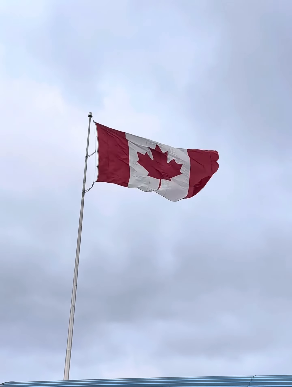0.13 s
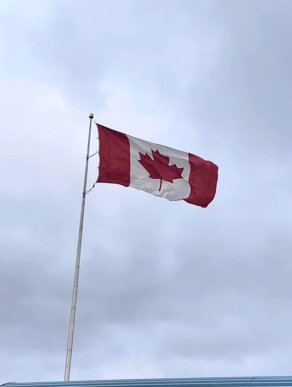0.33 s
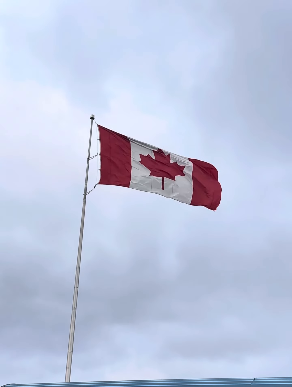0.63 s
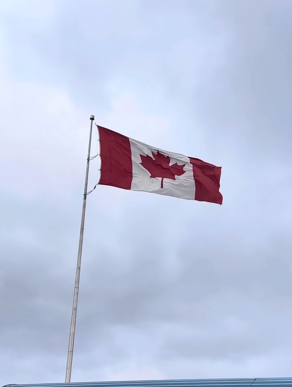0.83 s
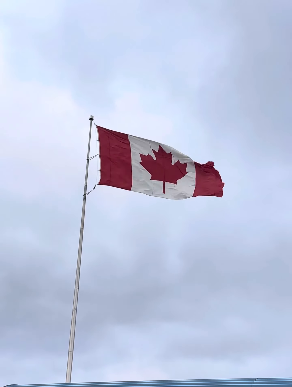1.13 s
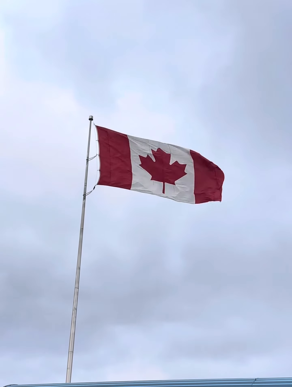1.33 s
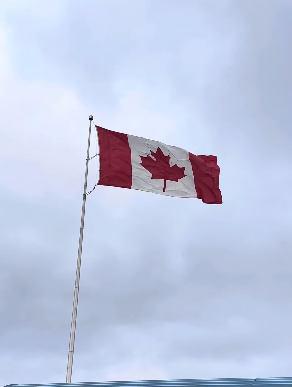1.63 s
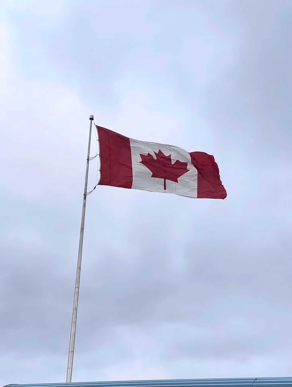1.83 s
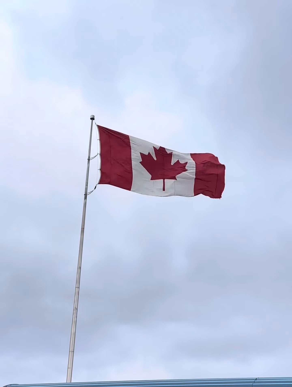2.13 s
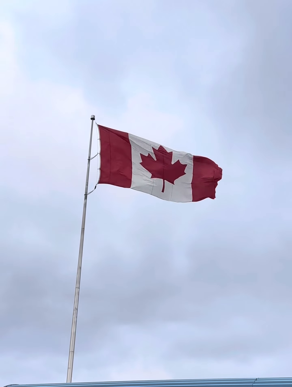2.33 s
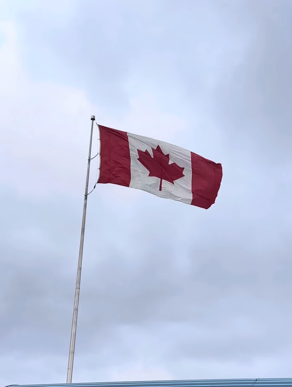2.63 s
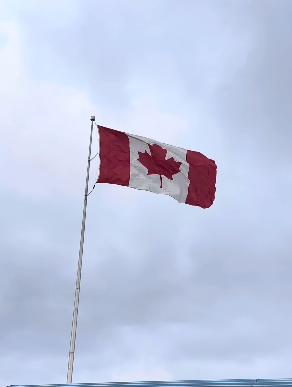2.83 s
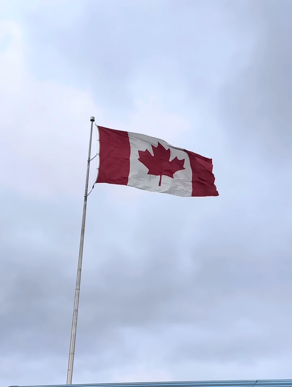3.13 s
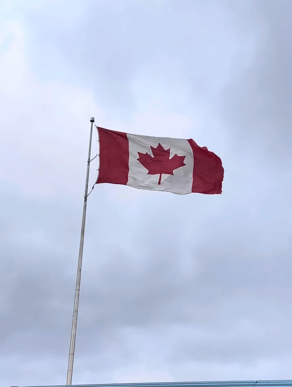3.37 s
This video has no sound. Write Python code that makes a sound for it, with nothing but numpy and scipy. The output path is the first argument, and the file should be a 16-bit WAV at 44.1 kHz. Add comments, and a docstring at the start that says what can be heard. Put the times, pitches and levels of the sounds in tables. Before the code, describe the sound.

Strong wind buffets and rumbles on a microphone while a flag flaps and cracks outdoors

```python
"""Strong wind drums, buffets and roars, slowly easing; a flag rustles, flutters, swishes, flaps and cracks.
The wind blows on a small hand-held microphone near a flagpole: buffeting and roar are flickering noise
bands, drumming is noise in a low resonance, pressure dips are ringing pushes. The cloth is hiss with
crackles, taps on a hollow note, grainy swishes, ringing flaps and short filtered pulses for cracks."""
import sys
import numpy as np
from scipy import signal
from scipy.fft import rfft, irfft
from scipy.io import wavfile
from scipy.ndimage import uniform_filter1d

SR = 44100
rng = np.random.default_rng(int(sys.argv[2]) if len(sys.argv) > 2 else 0)


def nominal_scale(level):
    """Amplitude ratio for a level in decibels (scalar or array-like)."""
    x = np.asarray(level, float) / 20
    return 10 ** x


def log_audio(samples):
    """Write samples as a 16-bit WAV file to the path given in sys.argv[1]."""
    # one column per channel
    frames = np.atleast_2d(samples).T
    # limit to full scale, then quantise
    limited = np.clip(frames, -1, 1)
    pcm = np.round(limited * 32767).astype(np.int16)
    wavfile.write(sys.argv[1], SR, pcm)


N = 154350  # samples


def rms_one(x):
    """Scale to rms 1."""
    return x / np.sqrt(np.mean(x ** 2) + 1e-20)


def level(rows):
    """Gain over time, linear in dB between (t/s, level/dB) rows."""
    t_s, level_db = np.transpose(rows)
    return nominal_scale(np.interp(np.arange(N) / SR, t_s, level_db))


def drift(rate_hz):
    """Slow random signal of rms 1: noise through two equal poles at rate_hz, computed at SR / 40."""
    r = np.exp(-80 * np.pi * rate_hz / SR)
    noise = rng.standard_normal(N // 40 + 2002)
    slow = signal.lfilter([1], [1, -2 * r, r * r], noise)[2000:]  # settled part
    return np.interp(np.arange(N) / 40, np.arange(len(slow)), rms_one(slow))


def band(x, low_hz, high_hz, order=2):
    """Butterworth band-pass."""
    edges_hz = [low_hz, min(high_hz, .45 * SR)]
    return signal.sosfilt(signal.butter(order, edges_hz, "band", fs=SR, output="sos"), x)


def broad(x, hz, octaves):
    """Gentle band reaching the given octaves either side of a centre."""
    return band(x, hz / 2 ** octaves, hz * 2 ** octaves, order=1)


def ring(clicks, hz, t60_s):
    """Two-pole resonance: a unit click starts a decaying sine of height 1."""
    r = nominal_scale(-60 / (t60_s * SR))
    w = 2 * np.pi * hz / SR
    return signal.lfilter([0, np.sin(w)], [1, -2 * r * np.cos(w), r * r], clicks + 1e-18)


def ticks(per_s, spread_db):
    """Random clicks of uneven size and either sign; rms 1."""
    sizes = nominal_scale(spread_db * np.minimum(rng.exponential(1, N), 4)) * rng.choice([-1, 1], N)
    return rms_one(sizes * (rng.random(N) < per_s / SR))


def coloured(sources, colour, shared_db, patchy_db, rate_hz):
    """Fifth-octave bands that flicker together and alone; neighbours come from different sources."""
    f_hz, density_db = np.transpose(colour)
    together = drift(rate_hz)
    edges = f_hz[0] * 2 ** np.arange(0, np.log2(f_hz[-1] / f_hz[0]) + 1 / 5, 1 / 5)
    out = 0
    for k, (low, high) in enumerate(zip(edges, edges[1:])):
        gain_db = np.interp(np.log(low * high) / 2, np.log(f_hz), density_db)
        flicker_db = shared_db * together + patchy_db * drift(rate_hz)
        out = out + nominal_scale(gain_db + flicker_db) * band(sources[k % 2], low, high)
    return rms_one(out)


def thuds(rows):
    """Soft pushes that swell over half a cycle and ring; rows t/s, peak/dB, f/Hz, t60/s."""
    out = np.zeros(N + SR)
    for t_s, peak_db, hz, t60_s in rows:
        half_cycle = int(SR / hz / 2)
        push = np.zeros(SR // 3)
        push[:half_cycle] = np.hanning(half_cycle)
        thud = ring(push, hz, max(t60_s, .005))
        out[int(t_s * SR):][:len(thud)] += nominal_scale(peak_db) * thud / np.abs(thud).max()
    return out[:N]


def roar():
    """Wind roar: flickering noise bands, made grainy by dense clicks."""
    # roar course: t/s, level/dB
    roar_level = [(0.0, -37.5), (0.13, -30), (0.24, -35.5), (0.52, -34), (0.78, -36.5), (1.48, -38.5),
                  (1.78, -37.5), (2.1, -40.5), (3.5, -38)]
    # roar spectrum: f/Hz, relative density/(dB per Hz)
    roar_colour = [(190, -31), (330, 0), (374, -2), (456, 0.5), (730, -2), (1130, -9), (1620, -12.5),
                   (1900, -22), (2400, -17.5), (2800, -26), (3300, -28), (5200, -50)]
    grains = ticks(per_s=500, spread_db=4.5)
    grainy = rng.standard_normal((2, N)) + nominal_scale(-4) * grains
    return level(roar_level) * coloured(grainy, roar_colour, shared_db=1.4, patchy_db=1.5, rate_hz=14.0)


def buffeting():
    """Wind buffeting: low noise bands, flickering."""
    # buffeting course: t/s, level/dB
    buffet_level = [(0.0, -20), (0.3, -31.5), (1.81, -31), (1.88, -34.5), (3.5, -35)]
    # buffeting spectrum: f/Hz, relative density/(dB per Hz)
    buffet_colour = [(18, -38), (30, -19.5), (70, -1.5), (195, -9), (377, -15.5), (500, -26), (650, -38),
                     (1100, -120)]
    noise = rng.standard_normal((2, N))
    return level(buffet_level) * coloured(noise, buffet_colour, shared_db=1.3, patchy_db=.8, rate_hz=22.0)


def drumming():
    """Wind drumming on the microphone: noise twice through one low resonance, swells partly evened out."""
    # drumming course: t/s, level/dB
    drum_level = [(0.0, -23.5), (0.04, -17.5), (0.6, -35), (1.46, -22), (1.57, -17.5), (1.64, -26.5),
                  (1.75, -11.5), (1.8, -24), (2.56, -32), (2.62, -27), (2.97, -40), (3.01, -23),
                  (3.06, -38.5), (3.5, -30.5)]
    drum_hz, pole_width_hz, evenness = 57.1, 30.5, 0.26  # evenness: 0 none, 1 full
    r = np.exp(-np.pi * pole_width_hz / SR)
    poles = [1, -2 * r * np.cos(2 * np.pi * drum_hz / SR), r * r]
    once = signal.lfilter([1], poles, rng.standard_normal(N + SR))
    drum = rms_one(signal.lfilter([1, -1], poles, once)[SR:])
    power = uniform_filter1d(uniform_filter1d(drum ** 2, size=700), size=700)
    swell = np.sqrt(power + .03)
    return level(drum_level) * rms_one(drum / swell ** evenness)


def pressure_dips():
    """Pressure dips on the microphone: ringing pushes that start downward."""
    # dips: t/s, peak/dB, f/Hz, t60/s
    dips = [(.039, -6, 132, 0.05), (.072, 0.5, 121, 0.04), (.091, -8.5, 125.3, 0.083),
            (.112, -12, 174.7, 0.11), (.127, -6, 269, 0.012), (.262, -16.5, 252, 0.028),
            (.716, -24, 277, 0.083), (.897, -14, 192, 0.017), (1.587, -5, 136, 0.031),
            (1.729, -9, 72.5, 0.042), (1.734, -7, 356, 0.023), (2.626, -19, 193.5, 0.061),
            (2.757, -19, 244, 0.041), (2.985, -20.5, 134.6, 0.13), (3.385, -20.5, 111, 0.086)]
    return -thuds(dips)


def rustle():
    """Cloth rustle: flickering hiss with random small crackles common to all bands."""
    # rustle course: t/s, level/dB
    rustle_level = [(0.0, -57), (0.54, -49), (0.71, -56), (2.44, -66), (2.65, -62.5), (3.21, -66),
                    (3.5, -60)]
    # rustle spectrum: f/Hz, relative density/(dB per Hz)
    rustle_colour = [(1200, -30), (2200, -2), (3500, -4), (5000, -4), (7000, -3), (10000, -2), (13000, -14),
                     (16000, -6)]
    crackles = ticks(per_s=150, spread_db=4.5)
    sources = rng.standard_normal((2, N)) + nominal_scale(-8) * crackles
    return level(rustle_level) * coloured(sources, rustle_colour, shared_db=1.9, patchy_db=1.3, rate_hz=18.0)


def flutter():
    """Taut cloth: dense uneven taps, half on a hollow note, half scattered on pitches around it."""
    # flutter course: t/s, level/dB
    flutter_level = [(0.28, -67), (0.315, -27), (0.375, -37), (0.41, -41.5), (0.49, -32.5), (0.555, -38.5),
                     (0.6, -36.5), (0.69, -35), (0.74, -76)]
    note_hz, width_hz = 730, 95.0
    taps = ticks(per_s=450, spread_db=6.0)
    t60_s = np.log(1000) / (np.pi * width_hz)
    pitches_hz = note_hz * np.array([1, 1, 1, .82, .92, 1.12])
    dealt = rng.integers(len(pitches_hz), size=N)  # pitch of each tap
    out = 0
    for k, hz in enumerate(pitches_hz):
        out = out + ring(ring(taps * (dealt == k), hz, t60_s), hz, t60_s / 2)
    return level(flutter_level) * rms_one(out)


def swishes():
    """Cloth swishes: grainy band of hiss that sets in quickly and fades over its length."""
    # swishes: t/s, length to 1/e/s, noise rms before shaping/dB, f/Hz
    swish_rows = [(0.045, 0.009, -44, 2800), (0.075, 0.011, -42, 2770), (0.147, 0.0084, -38, 3830),
                  (0.162, 0.017, -35, 2730), (0.393, 0.007, -41, 6030), (0.457, 0.064, -42.5, 9750),
                  (0.604, 0.041, -41.5, 1540), (1.156, 0.037, -58.5, 4970), (1.818, 0.027, -52, 4370),
                  (1.913, 0.022, -30.5, 705), (2.022, 0.17, -60, 7230), (2.292, 0.026, -62, 5970),
                  (2.458, 0.028, -41, 2020), (2.459, 0.08, -51, 4800), (2.577, 0.089, -56.5, 5960),
                  (2.623, 0.044, -45, 910), (2.955, 0.075, -53, 9600), (2.99, 0.11, -38, 660),
                  (3.135, 0.068, -40.5, 697), (3.36, 0.011, -43.5, 2670), (3.334, 0.1, -54, 5100)]
    rise_s = 0.0022
    out, t = np.zeros(N + SR), np.arange(SR // 5) / SR
    for t_s, length_s, rms_db, hz in swish_rows:
        grain_db = 2.6 * np.repeat(rng.standard_normal(len(t) // 20), 20)
        grain = rng.standard_normal(len(t)) * nominal_scale(grain_db)
        hiss = rms_one(broad(broad(grain, hz, octaves=.7), hz, octaves=.9))
        shape = np.minimum(t / rise_s, 1) * np.exp(-(t / length_s) ** 2.85)
        out[int(t_s * SR):][:len(t)] += nominal_scale(rms_db) * shape * hiss
    return out[:N]


def flaps():
    """Dull cloth flaps: soft pushes, each ringing for the same number of cycles."""
    # flaps: t/s, peak/dB, f/Hz
    flap_rows = [(0.041, -14, 430), (0.066, -13, 450), (0.109, -11, 436), (0.151, -15, 780),
                 (0.176, -17, 750), (0.252, -21, 520), (0.292, -17, 760), (0.343, -25, 740),
                 (0.393, -17.5, 900), (0.53, -23, 730), (0.718, -19, 545), (1.889, -25, 580),
                 (1.913, -21.5, 528), (2.979, -24, 620), (3.135, -16.5, 670), (3.172, -20.5, 610),
                 (3.19, -25.5, 567)]
    t60_cycles = 12.8
    return thuds([(t_s, peak_db, hz, t60_cycles / hz) for t_s, peak_db, hz in flap_rows])


def cracks():
    """Cloth cracks: sharp pulse, short noise puff and fainter tail, full below the colour, steep above."""
    # cracks: t/s, peak/dB, colour f/Hz
    crack_rows = [(0.1448, -15, 4050), (0.165, -28, 5030), (0.219, -36, 2300), (0.261, -20, 2800),
                  (0.293, -27, 3520), (0.305, -34, 5000), (0.391, -19.5, 6470), (0.436, -15, 1390),
                  (0.627, -46, 1800), (0.633, -21, 1770), (0.65, -25.5, 2170), (0.985, -27.5, 2400),
                  (1.175, -39, 4500), (1.732, -35, 6000), (1.886, -26, 1500), (1.914, -26, 3670),
                  (2.315, -27.5, 1900), (2.359, -31.5, 2700), (2.464, -30.5, 1900), (2.6176, -8.5, 6640),
                  (2.699, -38, 4500), (2.706, -25, 1600), (2.757, -30, 1000), (2.807, -25, 1480),
                  (3.134, -37, 1930), (3.191, -31, 2000), (3.387, -25, 6300)]
    puff_t60_s, tail_db, tail_t60_s = 0.0035, -29, 0.038
    out, t = np.zeros(N + SR), np.arange(SR // 10) / SR
    for t_s, peak_db, hz in crack_rows:
        decay = .4 * nominal_scale(-60 * t / puff_t60_s) + nominal_scale(tail_db - 60 * t / tail_t60_s)
        crack = rng.standard_normal(len(t)) * decay
        crack[0] += 2  # the pulse
        low_pass = signal.butter(3, min(1.4 * hz, .45 * SR), fs=SR, output="sos")
        high_pass = signal.butter(1, hz / 8, "high", fs=SR, output="sos")
        crack = signal.sosfilt(np.vstack([low_pass, high_pass]), crack)
        out[int(t_s * SR):][:len(t)] += nominal_scale(peak_db) * crack / np.abs(crack).max()
    return out[:N]


def flag_in_stereo(flag):
    """Flag reaches the left port slightly later; below alike_below_hz both channels carry it alike; treble
    partly unalike."""
    lag_s, alike_below_hz = 6.6e-5, 4300
    f_hz = np.fft.rfftfreq(N, 1 / SR)
    turn = np.pi * lag_s * np.maximum(f_hz - alike_below_hz, 0)  # half the lag each way
    pair = np.array([irfft(rfft(flag) * np.exp(1j * way * turn), N) for way in (-1, 1)])
    delayed = np.array([np.roll(flag, 40), np.roll(flag, 97)])
    return pair + nominal_scale(-18) * band(delayed, 6200, 15000)


def side_signal(low, air, flag, snaps):
    """Left-minus-right part: delayed wind for width, undelayed wind and flag for a lean to the left."""
    width_db, lean_db = -32, -16
    apart = np.roll(air, N // 50) * nominal_scale(width_db) + (air + flag) * nominal_scale(lean_db)
    side = band(apart, 424, 1670)
    side = signal.sosfilt(signal.cheby2(6, 40, 1700, fs=SR, output="sos"), side)
    return side + nominal_scale(-36) * np.roll(low + air, 900) + nominal_scale(-19) * snaps


def scene():
    """Wind nearly alike left and right; the flag's treble comes later on the left."""
    air = buffeting() + roar()
    low = drumming() + pressure_dips()
    snaps = cracks()
    flag = rustle() + flutter() + swishes() + flaps() + snaps
    side = side_signal(low, air, flag, snaps)
    return low + air + flag_in_stereo(flag) + side * [[1], [-1]]


def top_cut(x):
    """Nothing passes above the cut-off."""
    return signal.sosfilt(signal.butter(12, 16920, fs=SR, output="sos"), x)


def record(dry):
    """Peaks are rounded, then the top is cut steeply."""
    rounded = 1.5 * np.tanh(dry / 1.5)
    below_cut = np.fft.rfftfreq(N, 1 / SR) < 15850  # Hz
    mix = irfft(rfft(rounded) * below_cut, N)
    return top_cut(mix)


dry = scene()
out = record(dry)
log_audio(out)
```